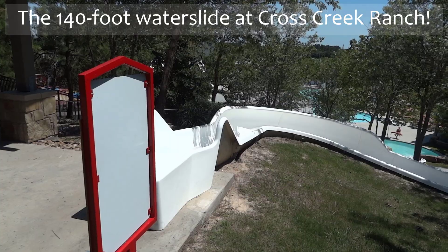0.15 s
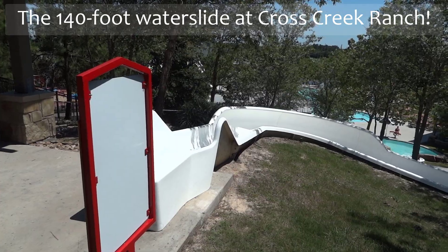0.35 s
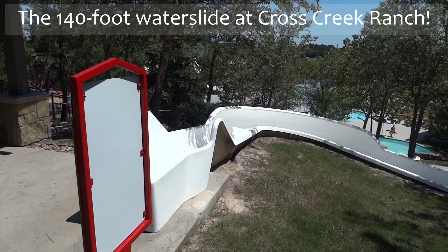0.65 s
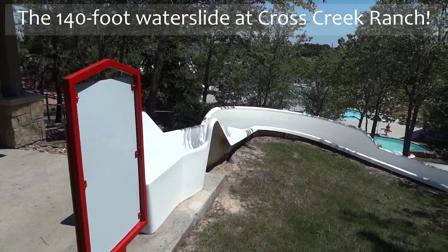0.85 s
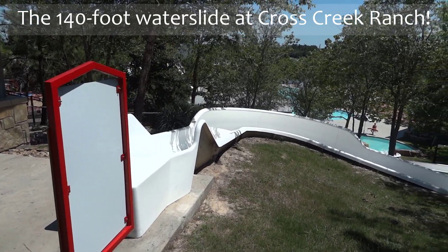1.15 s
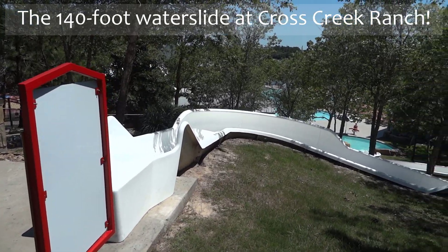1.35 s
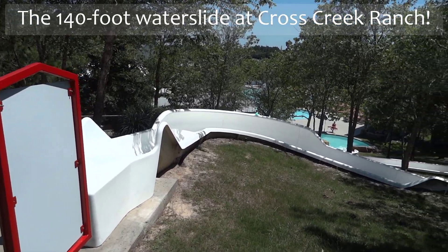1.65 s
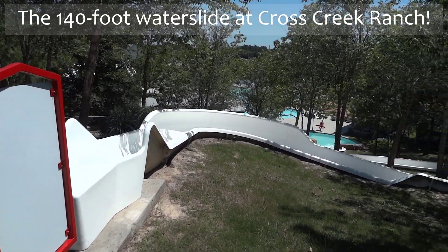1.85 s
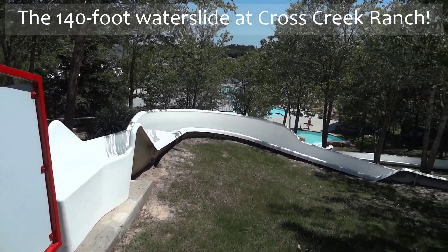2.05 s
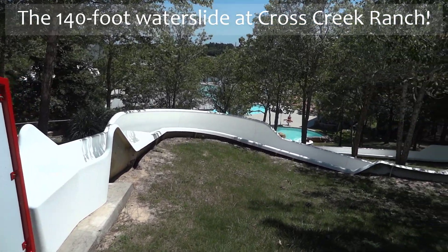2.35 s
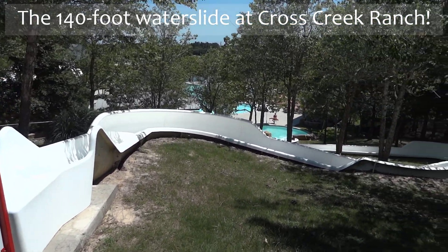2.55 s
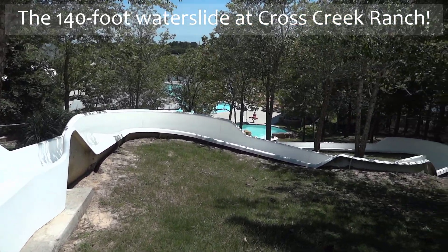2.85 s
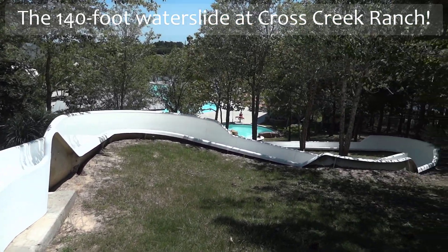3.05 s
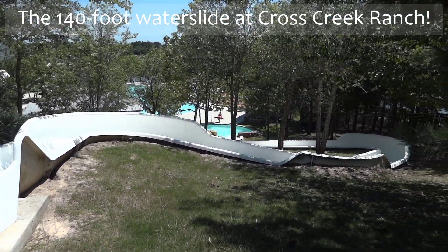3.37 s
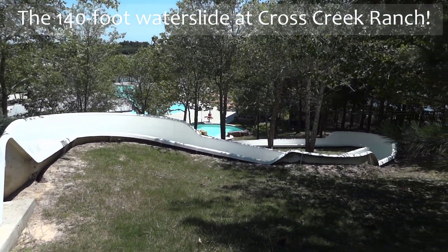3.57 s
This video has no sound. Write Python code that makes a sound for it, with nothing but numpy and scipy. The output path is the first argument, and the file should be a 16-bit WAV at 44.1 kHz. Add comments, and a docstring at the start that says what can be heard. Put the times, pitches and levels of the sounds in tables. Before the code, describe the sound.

A dense, even rush of water flows along an outdoor slide, bubbling and now and then gulping in the trough. A light breeze touches the microphone in the first half, while a faint high hiss swells and fades.

```python
"""Water down an open fibreglass slide

A sheet of water rushes steadily, carrying swarms of ringing bubbles and spray.
Large air pockets gulp in the trough, which colours the water; the sound drifts slightly left.
Light wind bumps the microphone, and a thin high hiss fades away towards the middle."""
import sys
import numpy as np
from scipy import signal
from scipy.fft import rfft, irfft, next_fast_len
from scipy.io import wavfile
from scipy.ndimage import uniform_filter1d, map_coordinates

SR = 44100
rng = np.random.default_rng(int(sys.argv[2]) if len(sys.argv) > 2 else 0)


def transcribe(u):
    """Save the signal u as a 16-bit wav file named by the first command-line argument.

    u: samples, shape (n,) or (channels, n), limited to [-1, 1]; the rate is SR.
    q: integer samples, one column per channel.
    """
    v = np.clip(np.atleast_2d(u).T, -1, 1)
    q = np.round(v * 32767).astype(np.int16)
    wavfile.write(sys.argv[1], SR, q)


N = 163611


def amp(db):
    """Decibels to gain."""
    return 10 ** (np.asarray(db) / 20)


def unit_rms(x):
    """Scale to rms 1."""
    return x / np.sqrt(np.mean(x ** 2) + 1e-20)


def over_freq(points, hz):
    """Interpolate (f/Hz, value) points on a log axis."""
    f, value = np.transpose(points)
    return np.interp(np.log(hz + 1), np.log(f + 1), value)


def over_time(points):
    """Interpolate (t/s, value) points at every sample."""
    return np.interp(np.arange(N) / SR, *np.transpose(points))


def wobble(knots_per_s):
    """Smooth random curve, rms about 1."""
    return map_coordinates(rng.standard_normal(1024), [np.arange(N) * knots_per_s / SR], mode="wrap")


def filtered(x, response):
    """Zero-phase filter with gain response(hz)."""
    size = next_fast_len(N + SR // 2)
    return irfft(rfft(x, size) * response(np.fft.rfftfreq(size, 1 / SR)), size)[..., :N]


def noise(gain, correlation, patchy_db=0):
    """Coloured stereo noise, rms 1, with optional time-frequency patches of random gain."""
    def mid_side_gain(hz):
        angle = np.arccos(np.clip(over_freq(correlation, hz), -1, 1)) / 2
        return gain(hz) * np.array([np.cos(angle), np.sin(angle)])

    spectra = signal.stft(rng.standard_normal((2, N)), nperseg=512)[2]
    patches = rng.standard_normal(spectra.shape[1:])
    for axis in (0, 1):
        patches = uniform_filter1d(patches, size=7, axis=axis)
    pair = signal.istft(spectra * amp(patchy_db * unit_rms(patches)), nperseg=512)[1][:, :N]
    mid, side = filtered(pair, mid_side_gain)
    return unit_rms(np.array([mid + side, mid - side]))


# Hiss envelope: t/s, level/dB
HISS_LEVEL = [(0, -49), (1.3, -42.5), (1.8, -50), (3.7, -66)]
# Left-right likeness of hiss and rush: f/Hz, correlation
STEREO_CORRELATION = [(100, 0.87), (300, 1), (600, 0.97), (1500, 0.94), (4000, 0.89), (10000, .85)]


def thin_hiss(centre_hz=9970, half_width_hz=320):
    """A faint, narrow band of high noise that swells and fades."""
    band = noise(lambda hz: 1 / (1 + ((hz - centre_hz) / half_width_hz) ** 4), STEREO_CORRELATION)
    return amp(over_time(HISS_LEVEL)) * band


# Breeze envelope: t/s, level/dB
BREEZE_LEVEL = [(0, -44), (.33, -54), (.41, -40.5), (.52, -45.5), (.74, -42), (.82, -45), (.87, -54),
                (1.15, -69), (1.7, -68), (3.5, -64), (3.7, -50)]
# Breeze spectrum: f/Hz, relative density/dB
BREEZE_SPECTRUM = [(20, -51), (50, 5), (95, 3), (170, 3.5), (260, 4), (400, 3), (900, -50), (3000, -90)]
# Wind bumps: t/s, length/s, centre f/Hz, level/dB
WIND_BUMPS = [(0.439, .028, 150, -33), (0.62, 0.075, 170, -28), (1.359, 0.066, 117, -33),
              (1.408, 0.032, 160, -35)]


def wind(bump_log_width=0.6):
    """A low breeze on the microphone with a few short, soft bumps."""
    t = np.arange(N) / SR
    rumble = noise(lambda hz: amp(over_freq(BREEZE_SPECTRUM, hz)), correlation=[(100, 0.5)])
    out = amp(over_time(BREEZE_LEVEL)) * rumble
    for start_s, length_s, centre_hz, db in WIND_BUMPS:
        band = lambda hz: np.exp(-.5 * (np.log((hz + 1) / centre_hz) / bump_log_width) ** 2)
        envelope = np.sin(np.pi * np.clip((t - start_s) / length_s, 0, 1))
        puff = envelope * noise(band, correlation=[(100, 0.25)])
        out += amp(db) * unit_rms(puff) * np.sqrt(length_s * SR / N)
    return out


def bubbles(start_s, hz, cycles, gain, pitch_rise=0.14, max_ring_s=.05):
    """Bubbles ring as sines that start softly, rise in pitch and decay 60 dB over their life."""
    life_s = (cycles / hz)[:, None]
    samples = np.arange(int(min(life_s.max(), max_ring_s) * SR))
    age = samples / SR / life_s
    tone = np.sin(2 * np.pi * cycles * age * (1 + pitch_rise * age / 2))
    decay = np.exp(-np.log(1000) * age)
    attack = 1 - np.exp(-2 * cycles * age)
    rings = tone * decay * attack * gain[:, None]
    index = (start_s * SR).astype(int)[:, None] + samples
    return np.bincount(index.ravel(), rings.ravel(), N)[:N]


def swarm(per_s, centre_hz, log_scatter, cycles, size_scatter_db, width=0.25, max_count=24000):
    """Random bubbles of many sizes, spread across the trough; rms 1."""
    count = min(int(per_s * N / SR), max_count)
    when, size_rank = rng.random((max_count, 2))[:count].T
    detune, place = rng.standard_normal((max_count, 2))[:count].T
    start_s = when * N / SR
    hz = np.clip(centre_hz * np.exp(log_scatter * detune), centre_hz / 4, 14000)
    gain = amp(-size_scatter_db * np.log(size_rank + .015)) * np.sqrt(hz / centre_hz)
    mid = bubbles(start_s, hz, cycles, gain)
    side = bubbles(start_s, hz, cycles, gain * place * width)
    return unit_rms(np.array([mid + side, mid - side]))


# Rush spectrum: f/Hz, relative density/dB
RUSH_SPECTRUM = [(100, -9), (220, -11.5), (280, -10), (400, 2), (520, 7), (680, 8.5), (900, 6.5),
                 (1080, 3.5), (1280, 2.5), (1500, -5), (3100, -3.5), (4500, -8.5), (11000, -15.5)]
# Swarms: rate/(1/s), centre f/Hz, log pitch scatter, life/cycles, size scatter/dB,
# mid-scene level/dB, drift/(dB/s)
BUBBLE_SWARMS = [(326, 485, 0.19, 10.3, 2, -31.5, 0.43), (522, 815, 0.11, 13.5, 3.5, -34, 0),
                 (702, 1550, 0.25, 28, -0.5, -33.5, 1.9), (1474, 2740, .28, 25, 4, -34, -.4),
                 (4130, 5730, 0.47, 3.5, 1, -35, -1)]


def stream(rush_db=-24, swing_db=1.48):
    """The rushing sheet of water and its bubble swarms, each wavering on its own."""
    from_middle_s = (np.arange(N) - N / 2) / SR
    rush = noise(lambda hz: amp(over_freq(RUSH_SPECTRUM, hz)), STEREO_CORRELATION, patchy_db=1)
    water = amp(rush_db) * rush
    for *shape, db, drift_db_per_s in BUBBLE_SWARMS:
        level_db = db + drift_db_per_s * from_middle_s + swing_db * wobble(30.19)
        water += amp(level_db) * swarm(*shape)
    return water


# Flow contour, scaled by body_share: t/s, relative level/dB
FLOW_LEVEL = [(0.1, -24.5), (0.16, -24), (0.76, -26.5), (0.81, -31), (0.83, -27), (1.2, -22), (1.21, -27.5),
              (1.31, -25), (1.78, -24.5), (1.81, -27), (2.3, -24.5), (2.33, -21), (2.35, -30), (2.8, -25),
              (3.61, -27), (3.66, -33)]
# Treble contour: t/s, relative level/dB
TREBLE_LEVEL = [(0.1, -33.5), (0.12, -31.5), (0.91, -33), (0.92, -31), (1.27, -33), (2.75, -32.5),
                (2.9, -31.5), (3.66, -31.5)]


def uneven_flow(water, split_hz=3800, body_share=0.31, slosh_db=0.09, flutter_db=0.41):
    """Body and treble swing separately with the flow; slosh and flutter move both."""
    flow_db, treble_db = over_time(FLOW_LEVEL), over_time(TREBLE_LEVEL)
    body_gain = amp(body_share * (flow_db - flow_db.mean()))
    treble_gain = amp(treble_db - treble_db.mean())
    treble = filtered(water, lambda hz: 1 - 1 / (1 + (hz / split_hz) ** 4))
    body = water - treble
    churn_db = slosh_db * wobble(25.57) + flutter_db * wobble(110)
    return amp(churn_db) * (body_gain * body + treble_gain * treble)


# Air pockets: t/s, length/s, f/Hz, level/dB
AIR_POCKETS = [(.188, .025, 430, -24), (.832, .025, 520, -25), (.910, .036, 533, -20),
               (.993, .025, 500, -23), (1.107, .02, 533, -24), (1.158, .028, 520, -21),
               (1.298, .035, 520, -22.5), (1.338, .025, 540, -23), (1.435, .025, 754, -24),
               (1.603, .025, 750, -21), (1.727, .016, 493, -19.5), (1.768, .025, 870, -24.5),
               (2.243, .025, 420, -24), (2.322, .022, 490, -20.5), (2.384, .022, 540, -26),
               (2.473, .03, 500, -21), (2.657, .035, 480, -20.5), (2.712, .035, 800, -26),
               (3.19, .035, 716, -27), (3.468, .022, 880, -25)]


def gulps(count=5, log_scatter=.11, lesser_gain=0.55):
    """Each air pocket breaks into one big bubble and a quick run of lesser ones."""
    out = np.zeros(N)
    order = np.arange(count)
    is_big = order == 1
    for onset_s, length_s, hz, db in AIR_POCKETS:
        jitter = rng.random(count) * (order > 1)
        start_s = onset_s + length_s * (order + jitter) / (count + 1)
        pitch_hz = hz * np.exp(log_scatter * rng.standard_normal(count) * ~is_big)
        gulp = bubbles(start_s, pitch_hz, cycles=14, gain=np.where(is_big, 1, lesser_gain))
        out += amp(db) * gulp * np.sqrt(length_s * SR / np.sum(gulp ** 2))
    return out


# Ring of the trough: f/Hz, gain/dB
TROUGH_RESPONSE = [(200, 0), (290, -3.5), (400, -3), (510, -1.5), (660, -3.5), (830, -1), (960, -1),
                   (1080, -3), (1300, 0)]


def trough(water, low_cut_hz=110):
    """The trough colours the water; bubbles radiate little below the low cut."""
    low_cut = lambda hz: 1 - 1 / (1 + (hz / low_cut_hz) ** 3)
    return filtered(water, lambda hz: amp(over_freq(TROUGH_RESPONSE, hz)) * low_cut(hz))


# Water balance: t/s, left minus right/dB
WATER_BALANCE = [(0, 0.2), (1.2, .5), (2.1, 1.0), (3.7, 1.5)]


def scene():
    """Water in the trough, drifting left over wind and a thin hiss."""
    water = trough(uneven_flow(stream()) + gulps())
    pan = amp(over_time(WATER_BALANCE) * np.array([[.5], [-.5]]))
    return water * pan + wind() + thin_hiss()


def record(dry, start_s=0.0577, fade_s=.002, top_hz=11150):
    """The sound cuts in after a brief silence and is sharply band-limited."""
    gate = np.clip((np.arange(N) / SR - start_s) / fade_s, 0, 1)
    return filtered(dry * gate, lambda hz: np.clip((top_hz - hz) / 100, 0, 1))


dry = scene()
out = record(dry)
transcribe(out)
```